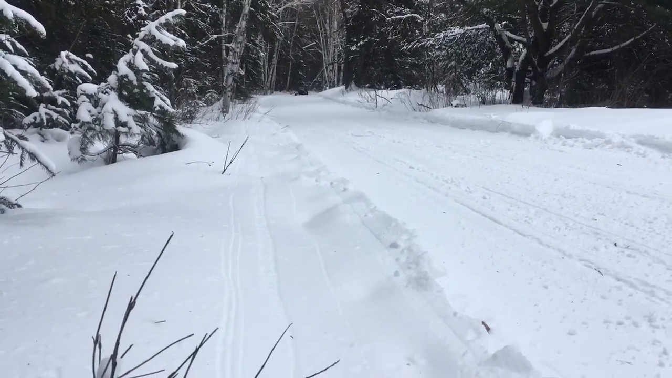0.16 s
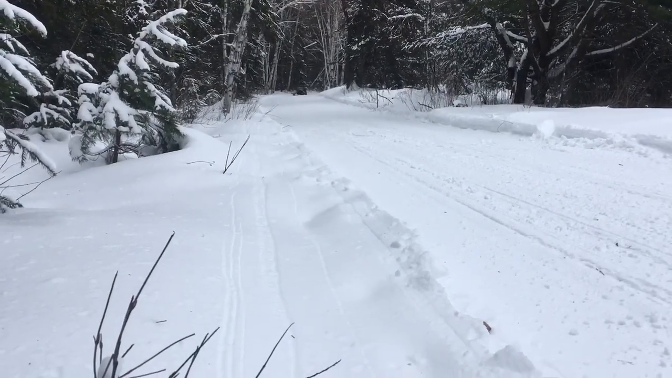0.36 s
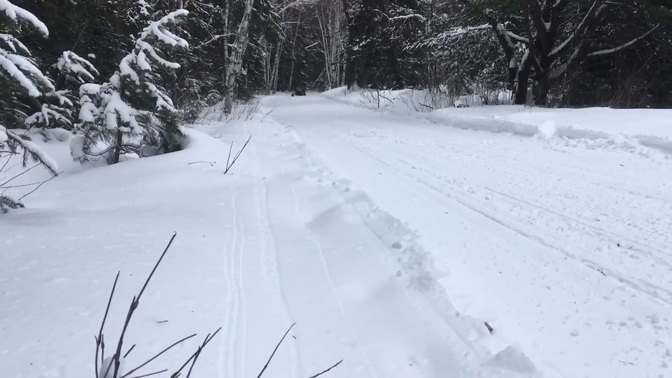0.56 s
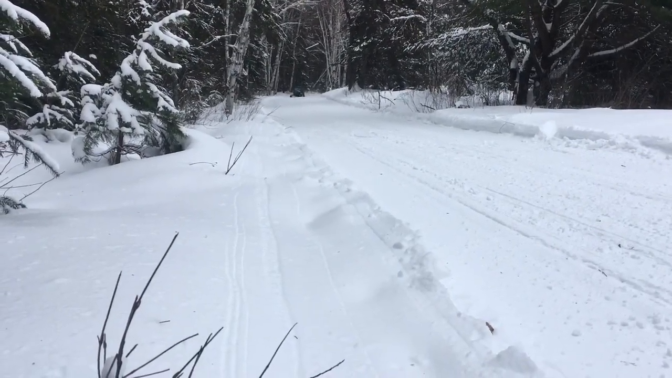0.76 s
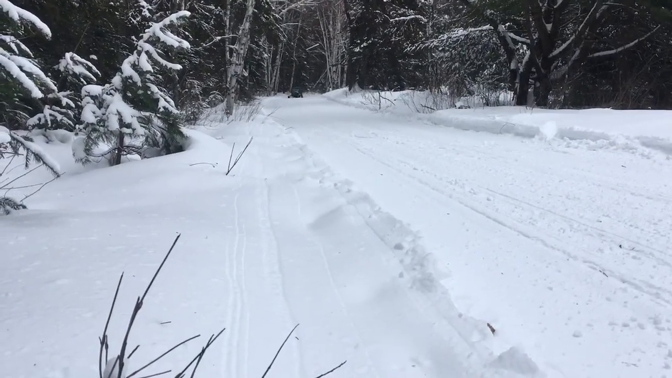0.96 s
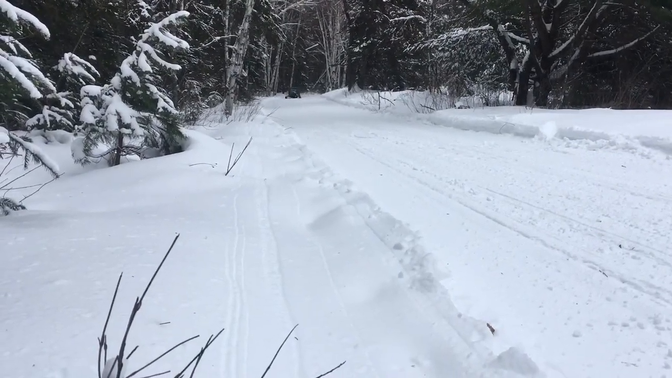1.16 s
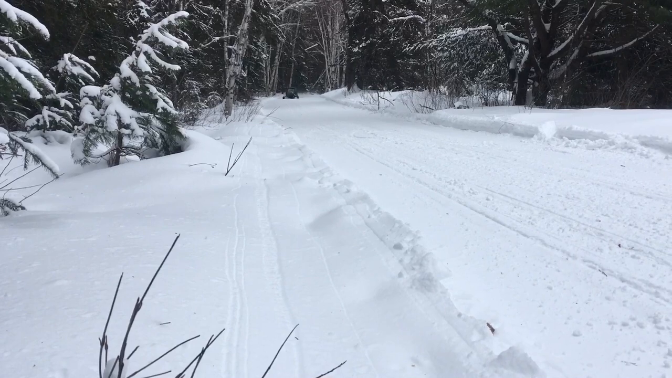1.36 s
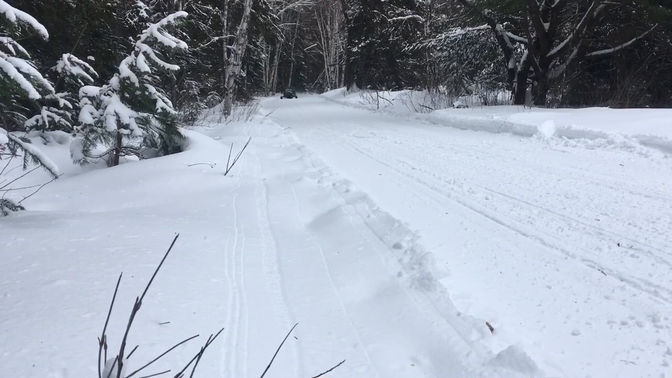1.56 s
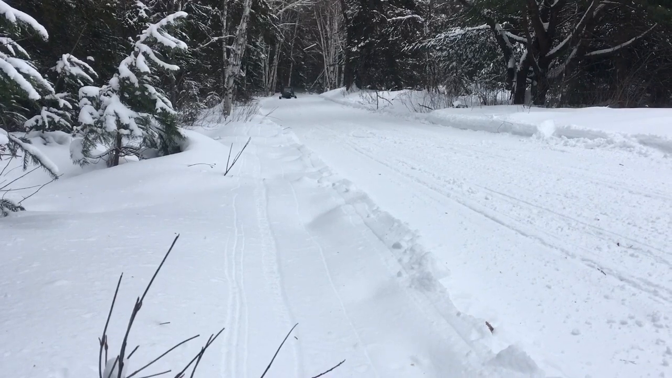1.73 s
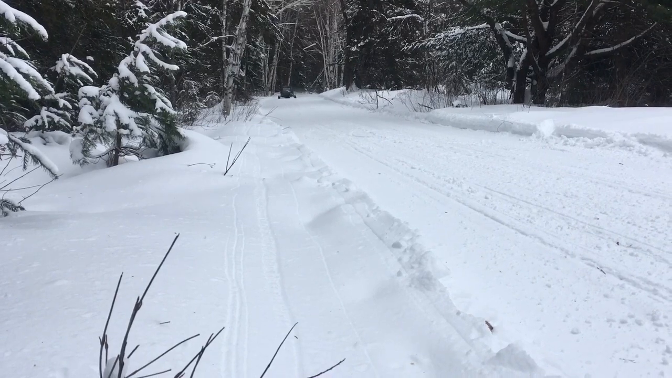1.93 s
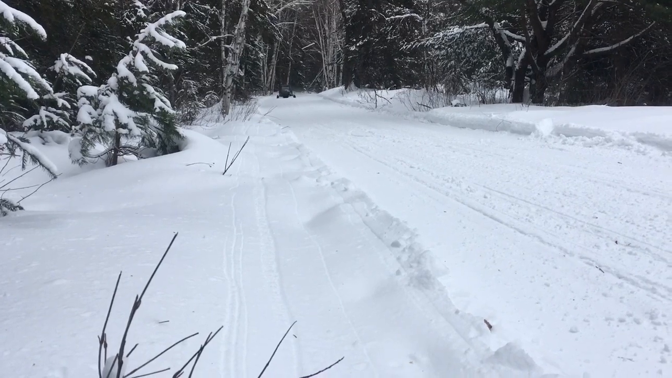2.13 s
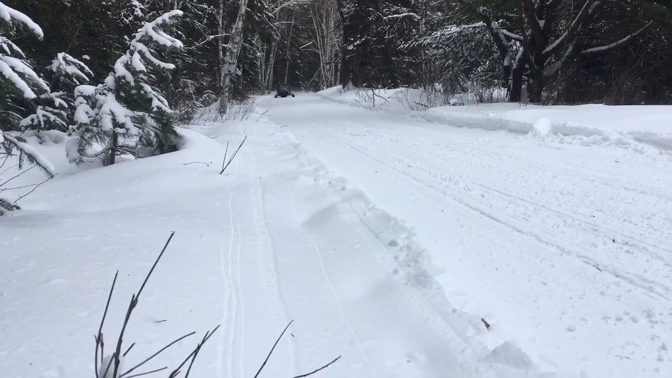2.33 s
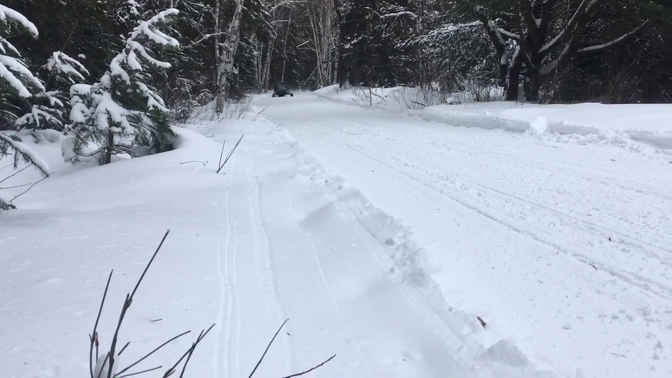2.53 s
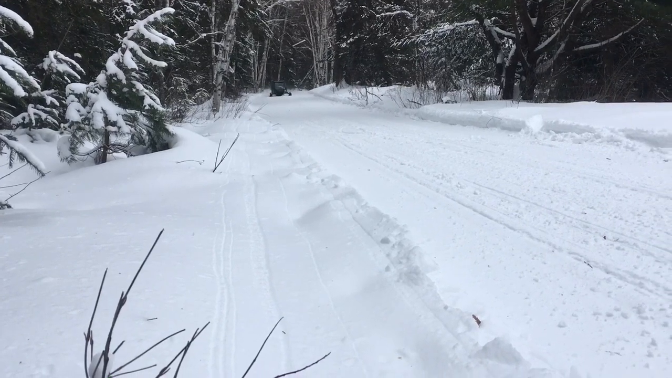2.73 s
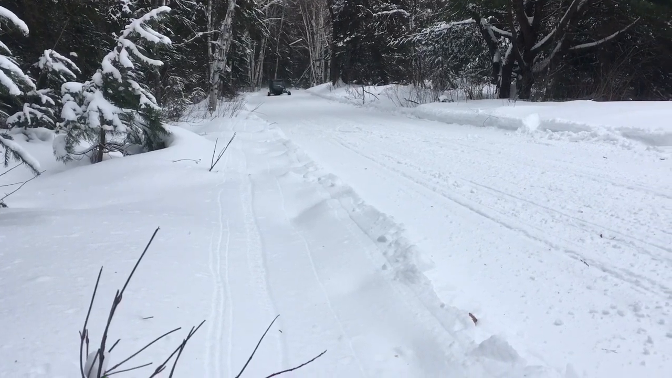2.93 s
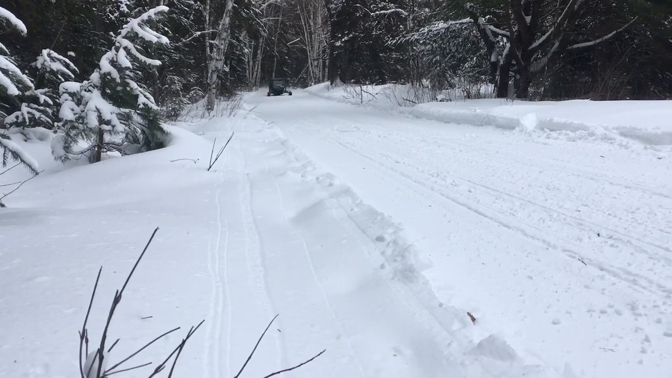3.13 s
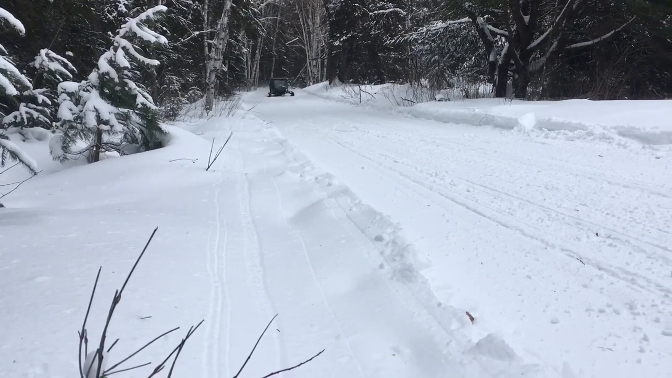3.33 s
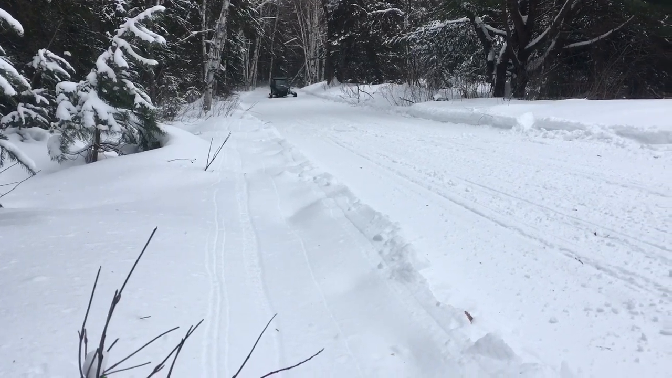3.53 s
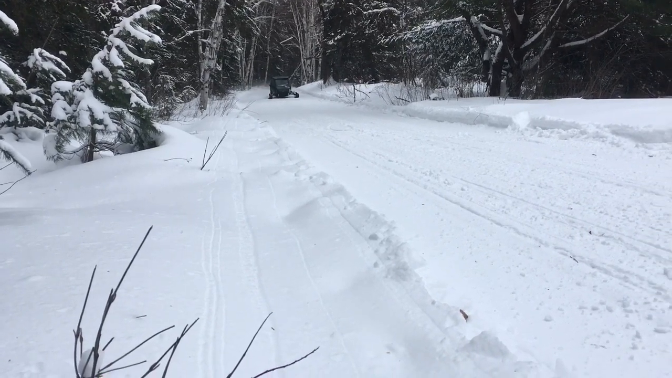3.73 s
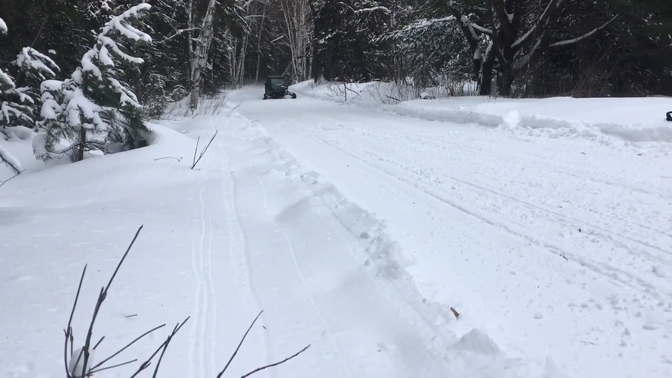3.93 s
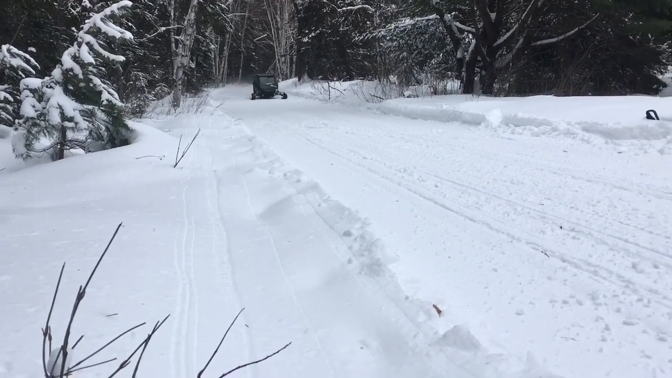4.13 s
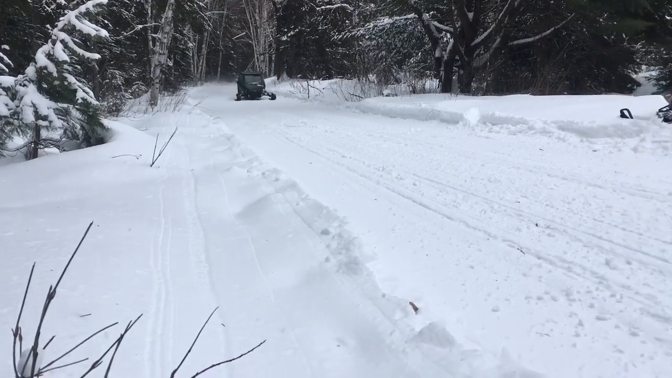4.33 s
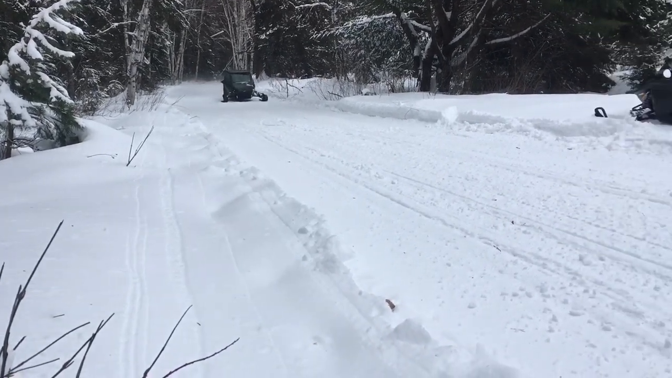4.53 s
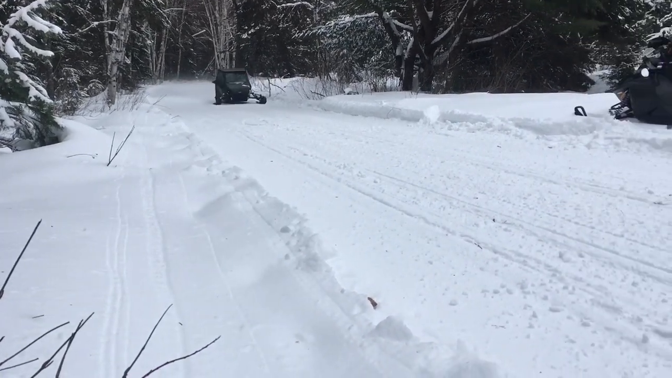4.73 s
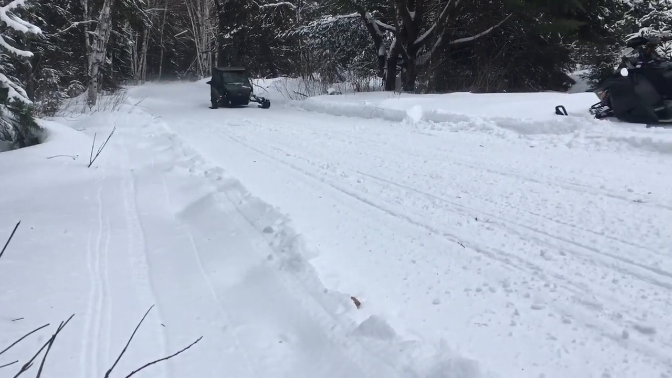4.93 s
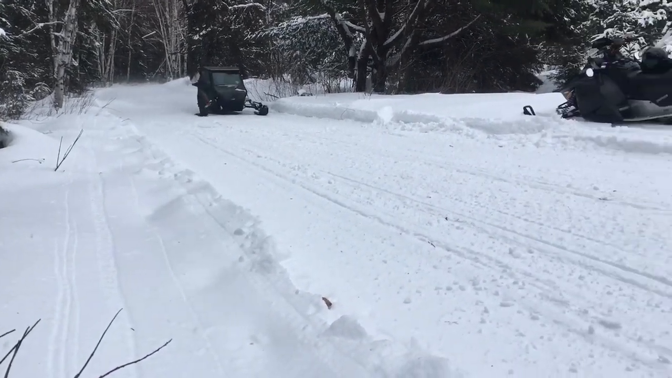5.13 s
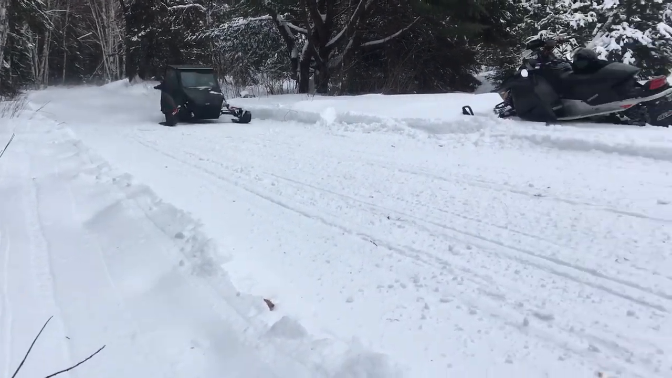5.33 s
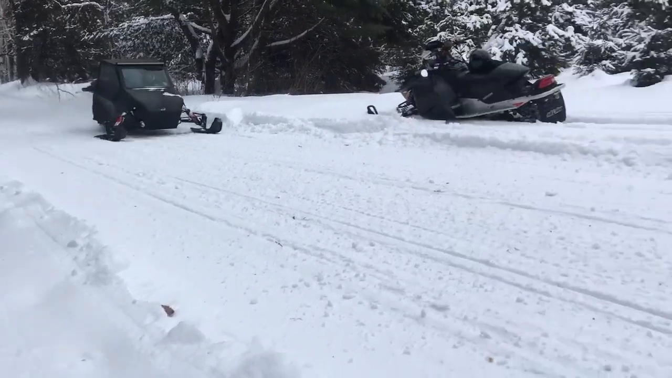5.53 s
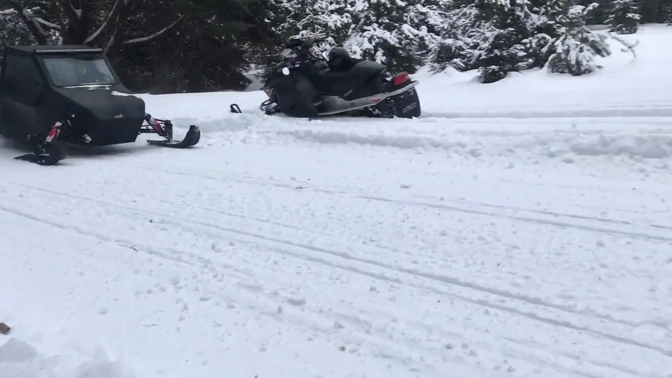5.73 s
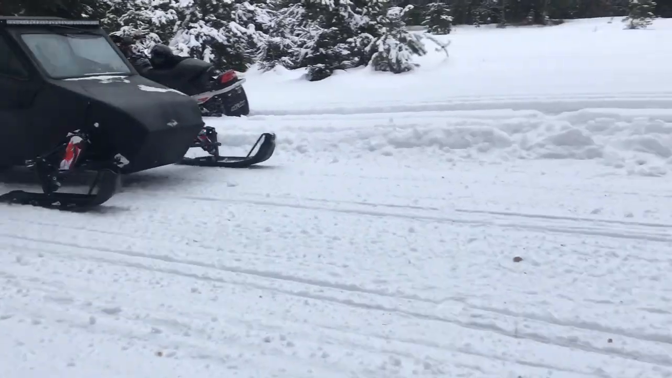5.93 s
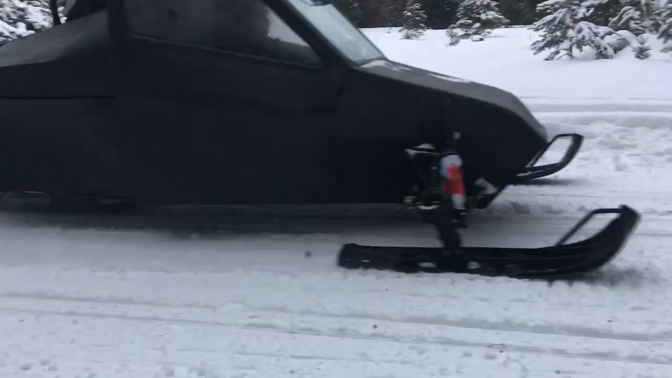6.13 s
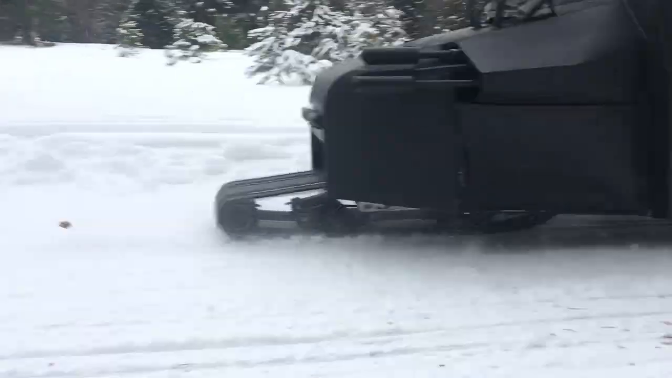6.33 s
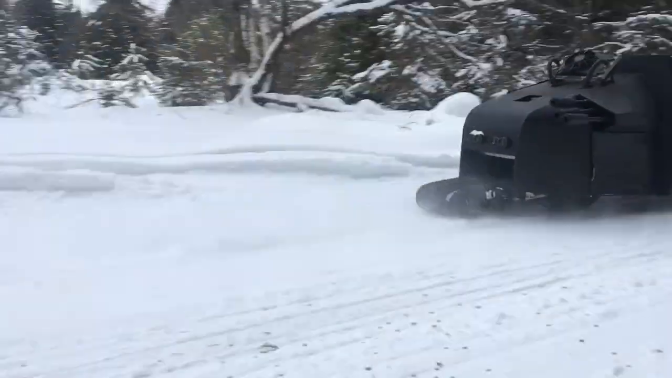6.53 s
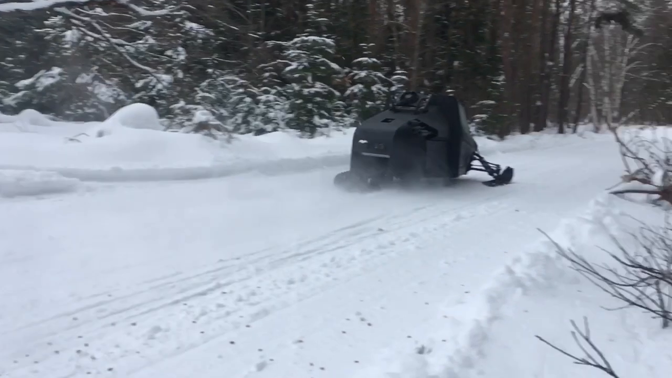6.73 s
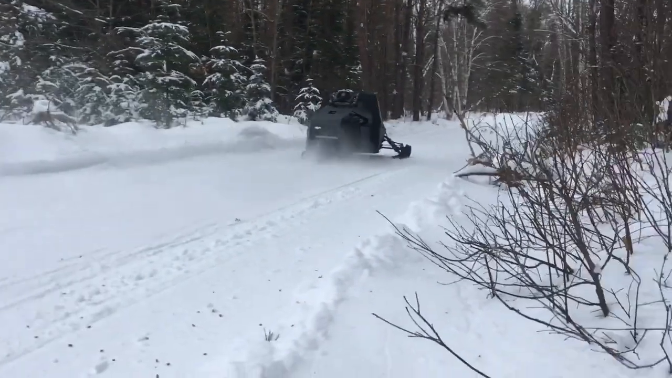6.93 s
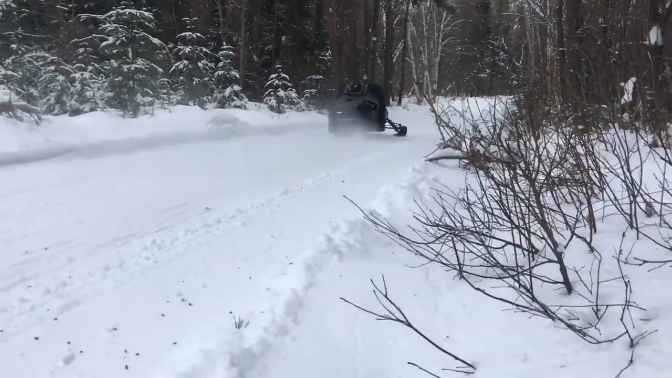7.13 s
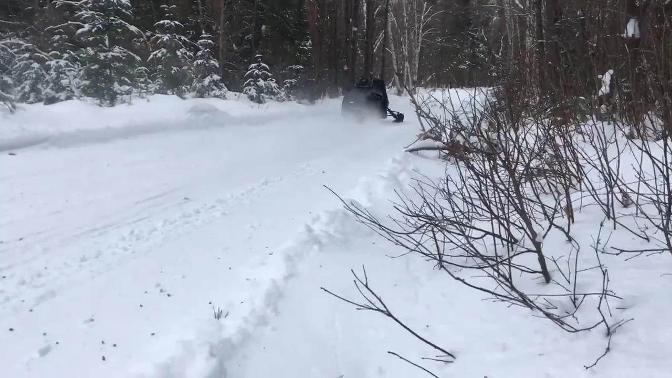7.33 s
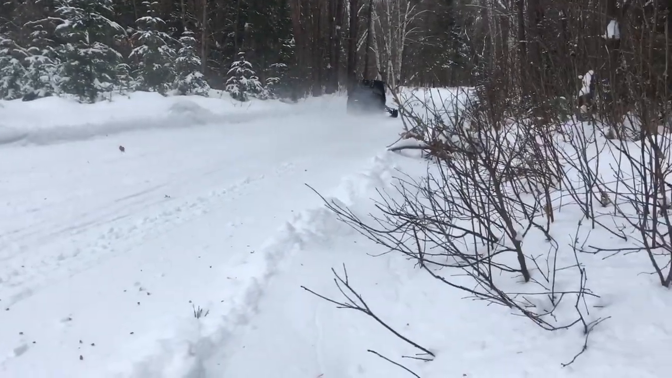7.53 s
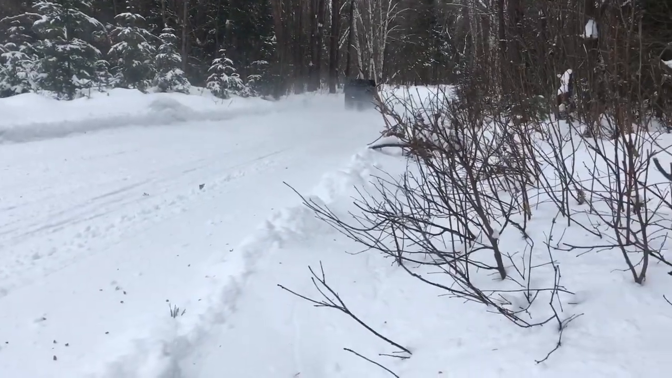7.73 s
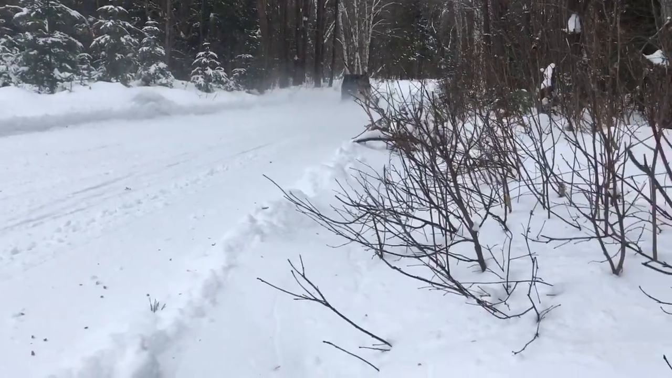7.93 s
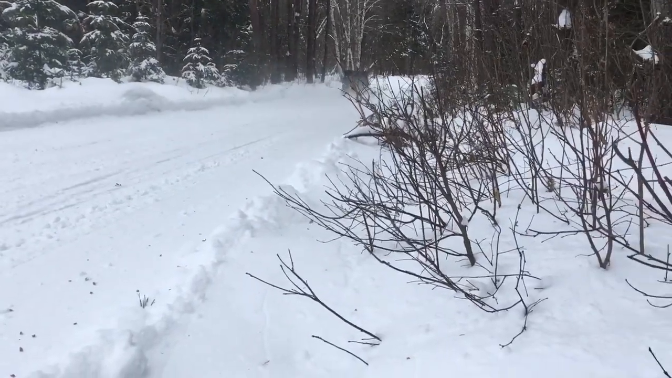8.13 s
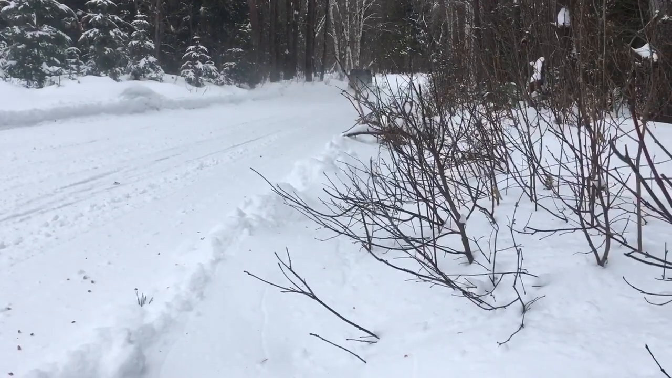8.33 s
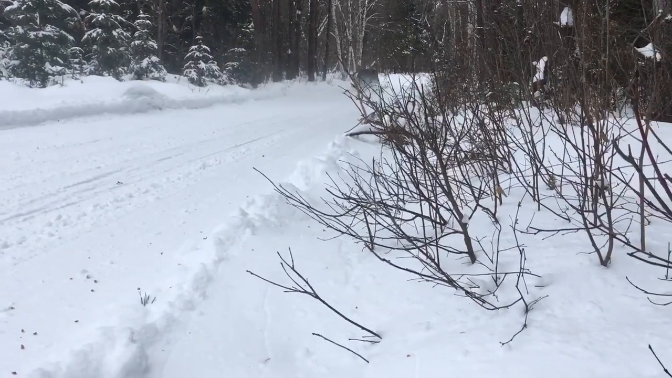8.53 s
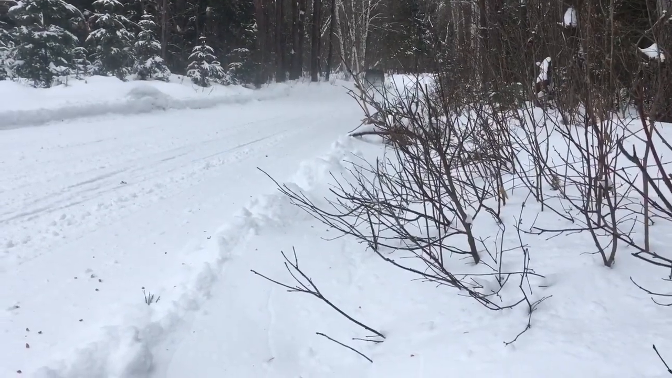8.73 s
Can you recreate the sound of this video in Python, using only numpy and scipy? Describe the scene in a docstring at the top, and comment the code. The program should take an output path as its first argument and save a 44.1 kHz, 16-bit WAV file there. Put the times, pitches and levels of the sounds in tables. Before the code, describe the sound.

A two-stroke snow vehicle nears along a snowy forest trail in raspy throttle bursts, sweeps close past with hissing track, then recedes with a last blip.

```python
"""On a snowy forest trail, a tracked snow vehicle comes down in bursts of throttle, passes close and fades.
Its three-cylinder two-stroke exhaust is a stack of wavering tones at multiples of the crank rate.
Trees return a blurred echo, made of delayed copies smeared by fading noise. Thump, firing and track lugs
are clean tones. Track and skis hiss and churn the snow, the hull rumbles, ground and wind rumble low and
gusts buffet the microphone: all of these are coloured noise that rises and falls."""
import sys
import numpy as np
from scipy import signal
from scipy.fft import rfft, irfft, next_fast_len
from scipy.io import wavfile
from scipy.ndimage import uniform_filter1d

SR = 44100
rng = np.random.default_rng(int(sys.argv[2]) if len(sys.argv) > 2 else 0)


def int16_out(signal):
    """Quantize to a 16-bit WAV file."""
    q = np.round(np.clip(np.atleast_2d(signal).T, -1, 1) * 32767)
    wavfile.write(sys.argv[1], SR, q.astype(np.int16))


N = 391608
STEP = 64   # samples between two points of the control grid, which carries all slow changes
TIMES = np.arange(N // STEP + 2) * STEP / SR   # s
PASS_S = 6.175   # moment of the pass

# Bursts of throttle; revs before the motion shifts them, levels for the vehicle one second of travel away:
# (opens/s, shuts/s, revs aimed at/Hz, revs sunk to/Hz, swell/s, sound runs on/s, fade/s,
#  exhaust open/dB, shut/dB, bark re exhaust open/dB, shut/dB, firing note open/dB, shut/dB)
THROTTLE_BURSTS = [(2.278, 2.802, 110, 91.7, 0.48, 0.047, 0.14, -17.5, -19, -1, -15.5, -29, -37),
                   (3.007, 3.589, 115.4, 100.1, 0.32, 0.059, 0.24, -16.5, -20.5, 1.5, -37, -31, -33.5),
                   (4.023, 4.459, 117.3, 89.2, 0.19, 0.074, 0.093, -16.5, -20.5, 0.5, -17, -34, -41.5),
                   (4.785, 6.516, 118.3, 83.7, 0.3, 0.048, .15, -15.5, -32.5, 0.5, -10, -27, -44.5),
                   (7.363, 7.738, 114.9, 82.84, 0.044, 0.072, 0.084, -12, -22.5, 0.5, -9, -26, -46)]
# Steady running before the first burst, on the same terms:
# (t/s, revs/Hz, exhaust/dB, bark re exhaust/dB, firing note/dB)
STEADY_RUNNING = [(0, 92.9, -18, -11.5, -51), (.55, 92.7, -18.5, -8, -48), (1, 93.8, -17.5, -11, -50),
                  (1.41, 95.1, -17, -9, -50), (1.9, 97.2, -19, -7, -42.5), (2.07, 97.25, -17.5, -13, -43),
                  (2.278, 97.6, -19.5, -7, -38)]


def from_db(db):
    """Gain of a level in dB."""
    return 10 ** (np.asarray(db) / 20)


def rms_one(x):
    """Scaled to rms 1."""
    return x / np.sqrt(np.mean(x ** 2) + 1e-20)


def coarse(rows):
    """Columns of a table, joined by straight lines on the control grid."""
    s, *columns = np.transpose(rows)
    return [np.interp(TIMES, s, column) for column in columns]


def fine(control):
    """From the control grid to every sample."""
    return np.interp(np.arange(N) / STEP, np.arange(len(TIMES)), control)


def at_hz(points, hz):
    """Level of a spectrum at given pitches, read on a log pitch axis."""
    points = np.array(points)
    return np.interp(np.log(hz), np.log(points[:, 0]), points[:, 1])


def bump(s, spread_s):
    """A single bell-shaped rise and fall on the control grid, peak 1."""
    return np.exp(-.5 * ((TIMES - s) / spread_s) ** 2)


def drift(rate):
    """Slow random wandering on the control grid, rms 1: noise smoothed to about the given rate in Hz."""
    r = np.exp(-2 * np.pi * rate * STEP / SR)
    settle = 2000   # points thrown away while the filter settles
    noise = rng.standard_normal(len(TIMES) + settle)
    return rms_one(signal.lfilter([1], [1, -2 * r, r * r], noise)[settle:])


def coloured(spectrum):
    """Noise of a given spectrum, rms 1, silent outside the first and last pitch of the table."""
    size = next_fast_len(N)
    hz = np.maximum(np.arange(size // 2 + 1) * SR / size, 1)
    inside = (hz > spectrum[0][0]) & (hz < spectrum[-1][0])
    white = rfft(rng.standard_normal(size))
    return rms_one(irfft(white * from_db(at_hz(spectrum, hz)) * inside, size)[:N])


def exhaust(turn, wobble_db=0.0868, rough_wobble_db=12):
    """Multiples of the crank rate; uneven firing makes each one waver in level and phase."""
    # Side of the vehicle that is heard: (t/s, side, roughness 0-1); the sides are 0 distant, 1 far front,
    # 2 near front, 3 flank, 4 near rear, 5 far rear, 6 coasting away
    aspect_rows = [(0, 0, 0.21), (2.3, 0, 0.12), (2.7, 1, 0.14), (4.9, 1, 0.11), (5.4, 2, 0.032),
                   (6.0, 2, .02), (6.13, 3, 0.03), (6.28, 3, 0.03), (6.35, 3.55, .02), (6.42, 4, 0.021),
                   (6.6, 4, 0.016), (6.75, 5.5, 0.03), (7.4, 6, 0.04), (7.46, 5.5, 0.059), (7.85, 5, .05),
                   (8.0, 6.5, 0.13), (8.88, 6.5, 0.15)]
    # Exhaust colour of sides 0 and 1, fixed in pitch: (f/Hz, level/dB)
    distant = [(380, -26), (480, -17.5), (580, 1), (690, -1), (790, -10), (1040, -11), (1150, -2),
               (1300, -9), (1850, -11.5), (2100, -17.5), (4600, -34.5)]
    far_front = [(430, -24), (540, 5), (680, 4.5), (780, 0.5), (880, -7.5), (1000, 2.5), (1450, 4.5),
                 (1570, -9.5), (1800, -5), (2000, -13.5), (2150, -17.5), (2800, -19.5), (4600, -37.5)]
    # Exhaust colour of sides 2 to 6, riding on the revs: (multiple of the crank rate, level/dB)
    near_front = [(1, -22), (2, -24), (3, -12), (4, -38), (5, -2.5), (6, -1.5), (7, -21), (8, -5.5),
                  (9, 5.5), (10, 4), (11, 2.5), (12, -10), (13, 0), (14, -3.5), (15, -15), (16, -2.5),
                  (17, -12.5), (18, -34), (19, -5.5), (20, -5.5), (21, -48), (22, -8), (23, -11.5),
                  (24, -31), (25, -12), (26, -11.5), (27, -40), (28, -21.5), (29, -18), (30, -15.5),
                  (31, -23), (32, -18), (33, -25), (34, -23), (35, -28), (36, -19.5)]
    flank = [(1, -19), (2, -16), (3, -9), (4, -21), (5, -7), (6, 1.5), (7, -10), (8, -16), (9, -13),
             (10, 0), (11, -7), (12, 3.5), (13, -12), (14, -8), (15, -20), (16, -2), (17, -8), (18, -24),
             (19, -19), (20, -37), (21, -13), (22, -14), (23, -17), (24, -15), (25, -22), (26, -28),
             (27, -41), (28, -44), (29, -36), (30, -40), (31, -40), (32, -49), (33, -36), (34, -43),
             (35, -40), (36, -45)]
    near_rear = [(1, -32), (2, -26), (3, -20), (4, -20.5), (5, 1.5), (6, -5), (7, -11.5), (8, -12.5),
                 (9, -7.5), (10, -18), (11, -3), (12, -11), (13, -29), (14, -9), (15, -43), (16, -11),
                 (17, -15), (18, -18), (19, -28), (20, -14), (21, -15), (22, -26), (23, -17.5), (24, -41),
                 (25, -17), (26, -37), (27, -14.5), (28, -26), (29, -22), (30, -15.5), (31, -24), (32, -22),
                 (33, -23), (34, -48), (35, -36), (36, -25)]
    far_rear = [(1, -11), (2, -21), (3, -12), (4, -30), (5, -9.5), (6, 3.5), (7, -3), (8, -4), (9, -13.5),
                (10, -14), (11, -24), (12, -4.5), (13, -3), (14, -12.5), (15, -27), (16, -28), (17, 0),
                (18, -9), (19, -4.5), (20, -25), (21, -15), (22, -19), (23, -11), (24, -22), (25, -15),
                (26, -26), (27, -16), (28, -28), (29, -29), (30, -28), (31, -24), (32, -22), (33, -13),
                (34, -29), (35, -32), (36, -18)]
    coasting = [(1, -2), (2, -11), (3, 0), (4, -26), (5, -18), (6, 0), (7, -6.5), (8, -1.5), (9, -22),
                (10, 2.5), (11, -1), (12, 0.5), (13, -5.5), (14, -2), (15, -7), (16, 4), (17, -17),
                (18, -9), (19, -7), (20, -12), (21, -5), (22, 4), (23, 7), (24, -8), (25, -3), (26, -17),
                (27, 1), (28, -24), (29, -27), (30, -22), (31, -29), (32, -39), (33, -22), (34, -32),
                (35, -34), (36, 0)]
    # Strength of the three exhaust pulses in a turn: one number for each cylinder
    cylinders = [0.92, 0.77, 0.5]
    # Echo from the trees: (t/s, level re exhaust/dB)
    echo_rows = [(0, -2), (4.9, -1), (5.3, -5), (5.6, -12), (5.8, -17), (6.05, -18), (6.2, -9), (6.35, -18),
                 (6.58, -18), (6.7, -9), (6.8, -15), (7.4, -13), (7.5, -8), (7.85, -7), (8.1, -4),
                 (8.88, -3)]
    top_db, top_slope_db = -30.5, -1.0   # multiples above the 36th: level and fall per multiple
    snow_echo = 0.36                     # strength of the reflection off the snow
    notch_hz_per_s, notch_nearest_s = 7200, .3

    rate = revs()
    level_db, bark_db, _ = throttle_levels()
    echo_db = coarse(echo_rows)[0]
    aspect, rough = coarse(aspect_rows)
    # neighbouring sides blend into each other
    shares = [np.clip(1 - np.abs(aspect - side), 0, 1) for side in range(7)]
    shared = drift(23.7)
    # the snow's reflection weakens a band that sinks as the vehicle nears
    notch_hz = notch_hz_per_s * np.hypot(TIMES - PASS_S, notch_nearest_s)

    multiples = list(zip(near_front, flank, near_rear, far_rear, coasting))[3:]   # from the 4th up
    multiples += [[(37 + i, top_db + top_slope_db * i)] * 5 for i in range(8)]
    lines, power = [], np.zeros((2, len(TIMES)))
    for rows in multiples:
        k = rows[0][0]
        hz = k * rate
        colours = [at_hz(distant, hz), at_hz(far_front, hz), *[db for _, db in rows]]
        gain = from_db(sum(share * db for share, db in zip(shares, colours)))
        gain = gain * np.abs(1 + snow_echo * np.exp(1j * np.pi * hz / notch_hz))
        high = np.clip((hz - 1430) / 200, 0, 1)   # the bark takes over around 1.5 kHz
        power += gain ** 2 / 2 * np.array([1 - high, high])
        lines.append((k, gain, high))

    # body and bark are evened out first, then the levels of the throttle are laid on
    body = 1 / np.sqrt(power[0])
    bark = from_db(bark_db) / np.sqrt(power[1])
    out = np.zeros(N)
    for k, gain, high in lines:
        waver_db = wobble_db * k + rough_wobble_db * rough   # snow and trunks shift the high multiples most
        gain = gain * (body * (1 - high) + bark * high) * from_db(waver_db * drift(9.8))
        # three pulses a third of a turn apart
        pulse_phase = np.angle(np.dot(cylinders, np.exp(-2j * np.pi * k * np.arange(3) / 3)))
        unsteady = rough * (np.sqrt(k) * drift(30) + .3 * k * shared)
        phase = pulse_phase + rng.normal(0, .35) + unsteady
        out += fine(gain) * np.cos(k * turn + fine(phase))
    wet = np.sqrt(1 + from_db(2 * echo_db))   # keeps the total level as the echo grows
    return fine(from_db(level_db) / wet) * (out + fine(from_db(echo_db)) * trees(out))


def revs():
    """Crank rate as heard: it chases the aim of the throttle, eased by the flywheel and shifted by the motion."""
    rev_up_s, rev_down_s, flywheel_s = .327, .273, .099   # time constants
    doppler_share, doppler_s, doppler_width_s = .053, 6.121, .14   # the pitch drops as the exhaust goes by
    rate = coarse(STEADY_RUNNING)[0]
    for opens, shuts, top, sunk, *_ in THROTTLE_BURSTS:
        for s, aim, slow_s in ((opens, top, rev_up_s), (shuts, sunk, rev_down_s)):
            later = TIMES >= s
            rate[later] = aim + (rate[later][0] - aim) * np.exp((s - TIMES[later]) / slow_s)
    r = np.exp(-STEP / SR / flywheel_s)
    rate = rate[0] + signal.lfilter([1 - r], [1, -r], rate - rate[0])
    gone = TIMES - doppler_s
    drop = gone / (gone ** 4 + doppler_width_s ** 4) ** .25   # from -1 before to 1 after
    return rate * (1 - doppler_share * drop)


def throttle_levels():
    """Exhaust, bark and firing note swell when the throttle opens, hold, and fade when it shuts."""
    # Levels at the end: exhaust/dB, bark re exhaust/dB, firing note/dB
    last_db = (-28.5, 16, -53)
    # The hull screens the exhaust while it goes by: (t/s, exhaust change/dB, bark change/dB)
    screen = [(5.45, -1.5, -2), (5.88, -2, -4.5), (6.09, -4.5, -11.5), (6.17, -5.5, -31), (6.22, -5.5, -18),
              (6.3, 0.5, -13), (6.4, 2, -14.5), (6.54, 0.5, -6.5), (6.7, -2, -12)]
    sound_lag_s = 0.049   # from opening the throttle to the start of the swell
    louder_db_per_hz, mean_revs_hz = 0.1812, 101.6   # the exhaust grows with the revs

    rows = [(s, *db) for s, _, *db in STEADY_RUNNING]
    before = rows[-1][1:]
    for opens, shuts, _, _, swell, runs_on, fade, *db in THROTTLE_BURSTS:
        opened, closed = db[::2], db[1::2]
        opens, shuts = opens + sound_lag_s, shuts + runs_on
        rows += [(opens, *before), (opens + swell, *opened), (shuts, *opened), (shuts + fade, *closed)]
        before = closed
    exhaust_db, bark_db, firing_db = coarse(rows + [(N / SR, *last_db)])
    screen_db, bark_screen_db = coarse(screen)
    exhaust_db += screen_db + louder_db_per_hz * (revs() - mean_revs_hz)
    return exhaust_db + nearness_db(), bark_db + bark_screen_db, firing_db + nearness_db()


def nearness_db():
    """Level that rises towards the pass and falls after it, about 0 dB one second of travel away."""
    rounding_s = 0.61   # rounds off the rise and fall of level around the pass
    return -20 * np.log10(np.hypot(TIMES - PASS_S, rounding_s))


def trees(x, count=18):
    """Trunks beside and behind the vehicle echo it at lower pitches while it nears, higher once it has passed."""
    t60_s, start_s = 1, .05   # time for the blur to fade by 60 dB; delay added to every echo
    closing_share = .035      # closing speed over speed of sound
    t, lead = np.arange(N) / SR, SR
    # the engine was already running: the first second, mirrored, leads in
    padded = np.concatenate([x[lead:0:-1], x])
    nearing = PASS_S - np.abs(t - PASS_S)   # extra path grows until the pass, then shrinks
    stands = 0
    for share in (np.arange(count) + rng.random(count)) / count:
        lag = start_s + 2 * closing_share * share * (nearing + 2.5)
        stands = stands + np.interp((t - lag) * SR + lead, np.arange(len(padded)), padded)
    # fading noise blurs the echoes
    age = np.arange(SR) / SR
    tail = rng.standard_normal(SR) * from_db(-60 * age / t60_s)
    stands = np.concatenate([stands[lead:0:-1], stands])
    return signal.fftconvolve(stands, tail / np.sqrt(count * np.sum(tail ** 2)))[lead:lead + N]


def low_notes(turn):
    """Clean tones: one thump a turn, the three firings a turn, and the drone of the track lugs."""
    # Thump once a turn: (t/s, level/dB)
    thump_rows = [(0, -58.5), (2.42, -46.5), (2.84, -63), (3.04, -42.5), (3.56, -54), (4.08, -40.5),
                  (4.55, -51), (4.8, -31.5), (5.12, -41.5), (5.59, -30), (5.84, -38), (6.2, -29.5),
                  (6.68, -53), (6.83, -34), (7.12, -44), (7.44, -32.5), (7.85, -28.5), (8.09, -25.5),
                  (8.26, -43), (8.55, -44), (8.88, -46)]
    # Track lugs on the drive wheel: (t/s, f/Hz, level/dB)
    lug_rows = [(0, 194, -59), (1.7, 196.7, -55.5), (2.55, 215, -57), (3.36, 243.1, -52), (3.73, 257, -43),
                (4.13, 252.8, -42), (4.45, 267.4, -41), (4.85, 259.5, -44), (5.1, 264, -37),
                (5.8, 287.4, -39), (6.11, 287.3, -29.5), (6.6, 269.5, -32), (6.75, 262.3, -42.5),
                (7.45, 243.9, -30.5), (7.9, 242, -41), (8.3, 226.6, -41.5), (8.88, 217.3, -38.5)]
    thump_db = coarse(thump_rows)[0] + 1.77 * drift(3.0)
    out = fine(from_db(thump_db)) * np.cos(turn)
    firing_db = throttle_levels()[2] + 2.3 * drift(7.7)
    out += fine(from_db(firing_db)) * np.cos(3 * turn + fine(0.5 * drift(13)))
    lug_hz, lug_db = coarse(lug_rows)
    lug_phase = 2 * np.pi * np.cumsum(fine(lug_hz + 1.57 * drift(8.5))) / SR
    return out + fine(from_db(lug_db + 2.65 * drift(30))) * np.cos(lug_phase)


def running_gear(turn):
    """Track and skis hiss and churn the snow in uneven spurts, a little pulsed by each firing."""
    # Work of track and skis on the snow, one second of travel away: (t/s, hiss/dB, churn/dB)
    snow = [(0, -42.5, -33), (2.3, -41, -35), (2.5, -39, -32.5), (3.3, -37, -26.5), (4.1, -35, -25.5),
            (4.7, -35, -35), (5.2, -33.5, -23.5), (5.5, -34, -21.5), (6.0, -35, -33.5), (6.55, -31.5, -28),
            (6.68, -40.5, -36), (7.0, -39.5, -36), (7.42, -29.5, -24), (7.79, -30.5, -26.5),
            (8.28, -33.5, -26), (8.88, -33, -24)]
    # Short sprays of snow in the hiss: (t/s, level added/dB, spread of the bell shape/s)
    sprays = [(3.427, 3.5, .05), (5.312, 2, .05), (5.75, 2, .06), (6.281, 3, .06), (8.437, 3.5, 0.065),
              (8.68, 5, .025)]
    # Colour of the hiss and of the churn: (f/Hz, level per Hz/dB)
    hiss_colour = [(2530, -19), (4300, -2.5), (4890, -6), (5880, 1), (7650, -3.5), (9490, -1),
                   (10300, -5.5), (11200, -3), (12900, -4.5), (15600, -11)]
    churn_colour = [(250, -6), (420, -12.5), (496, 1.5), (727, 2.5), (886, -2), (1620, -3), (1760, -1.5),
                    (2250, -5.5), (3340, -6), (5000, -23), (6500, -34), (11000, -120)]
    # Air dulls the hiss with distance: (t/s, loss per 10 kHz/dB), counted from 9 kHz
    air = [(0, 19), (2.2, 11), (3.4, -1.5), (4.5, -2.5), (6.6, 0.5), (7, 4), (8.88, 9)]

    hiss_db, churn_db = coarse(snow) + nearness_db()
    hiss_db += sum(db * bump(s, spread_s) for s, db, spread_s in sprays)
    spurts = drift(38)
    pulse = 1 + 0.12 * np.cos(3 * turn)
    hiss, already_used = coloured(hiss_colour), 0
    out = fine(from_db(churn_db + .5 * spurts)) * coloured(churn_colour)
    for edge_hz in (6500, 8700, 12000, 19500):   # each slice of the treble fades by its own height
        below = signal.sosfiltfilt(signal.butter(4, edge_hz, fs=SR, output="sos"), hiss)
        lost_db = coarse(air)[0] * (edge_hz - 9000) / 10000
        slice_db = hiss_db - lost_db + 0.32 * spurts + 1.7 * drift(30)
        out += fine(from_db(slice_db)) * (below - already_used)
        already_used = below
    return pulse * out


def rumble():
    """Hull and track of the vehicle close by: a dull lumpy roar of low noise that peaks at the pass."""
    # Strength of the roar: (t/s, level/dB)
    roar_rows = [(0, -72.5), (3, -59), (5, -47), (5.9, -45), (6.1, -30), (6.35, -33.5), (6.6, -45),
                 (7.2, -49), (7.6, -48), (8.88, -67)]
    # Its colour: (f/Hz, level per Hz/dB)
    roar_colour = [(90, -14), (130, 5), (200, -0.5), (260, 0.5), (340, -6)]
    return fine(from_db(coarse(roar_rows)[0] + 2.0 * drift(4.8))) * coloured(roar_colour)


def ground_and_wind():
    """Lumpy low rumble, with short, broader gusts of differing strength, each swelling smoothly."""
    # Low rumble of ground and wind, swelling towards the pass: (t/s, level/dB)
    low_rows = [(0, -64), (.5, -62), (1.1, -64), (1.7, -62), (2.5, -60), (3.1, -54.5), (4.1, -49.5),
                (4.6, -45.5), (5.1, -39.5), (6.2, -35.5), (6.5, -45), (7.2, -46), (7.7, -36), (8.3, -42),
                (8.88, -41)]
    # Gusts on the microphone: (t/s, level/dB, spread of the bell shape/s)
    gust_rows = [(.78, -55, .05), (2.2, -56, .06), (3.46, -52, .05), (4.15, -46, .05), (5.19, -37, .04),
                 (5.49, -37, .05), (5.74, -37, .04), (6.26, -35, .04), (7.2, -45, .03), (7.5, -39, .05),
                 (7.84, -37, .035), (8.085, -25.5, .026), (8.17, -29, .018), (8.54, -30, .022),
                 (8.8, -41, .02)]
    # Colour of the low rumble and of the gusts: (f/Hz, level per Hz/dB)
    low_colour = [(12, -43), (20, -44), (43, -2.5), (70, 3.5), (109, 0), (230, -4.5), (400, -41),
                  (520, -55), (880, -120)]
    gust_colour = [(12, -30), (25, -8), (50, 3), (110, 2), (170, -0.5), (260, -7.5), (420, -17.5),
                   (700, -40), (1200, -120)]
    gain = from_db(coarse(low_rows)[0] + 2.0 * drift(11))
    gusts = sum(from_db(db) * bump(s, spread_s) for s, db, spread_s in gust_rows)
    buffet = coloured(gust_colour)
    # dividing by its own smoothed strength evens out the noise inside each gust
    power = uniform_filter1d(uniform_filter1d(buffet ** 2, size=900), size=900)
    smoothed_buffet = buffet / np.sqrt(np.abs(power) + .05)
    return fine(gain) * coloured(low_colour) + fine(gusts) * smoothed_buffet


def scene():
    """Engine, running gear, ground and wind at one microphone."""
    turn = 2 * np.pi * np.cumsum(fine(revs())) / SR   # crank angle, radians
    return (exhaust(turn) + low_notes(turn) + running_gear(turn) + rumble() + ground_and_wind())[None]


def record(dry):
    """The microphone adds its own faint hiss; the highest peaks are rounded at full scale; the top is cut."""
    self_noise_db, cutoff_hz = -74, 15700
    dry = dry + from_db(self_noise_db) * rng.standard_normal(dry.shape)
    rounded = dry / (1 + np.abs(dry) ** 6) ** (1 / 6)
    return signal.sosfilt(signal.ellip(12, .5, 80, cutoff_hz, fs=SR, output="sos"), rounded)


dry = scene()
out = record(dry)
int16_out(out)
```